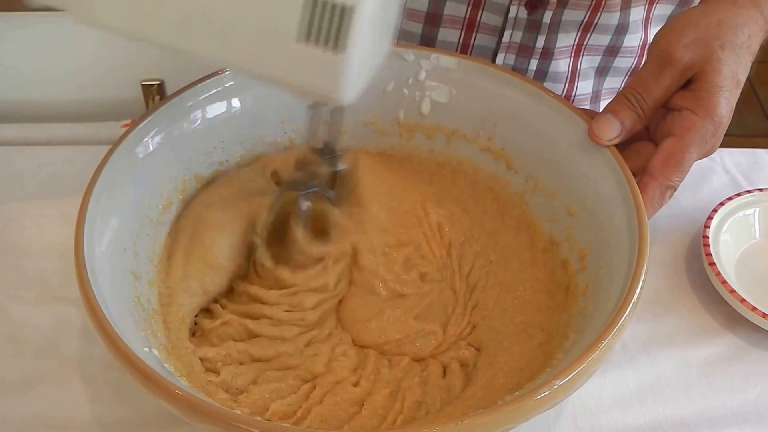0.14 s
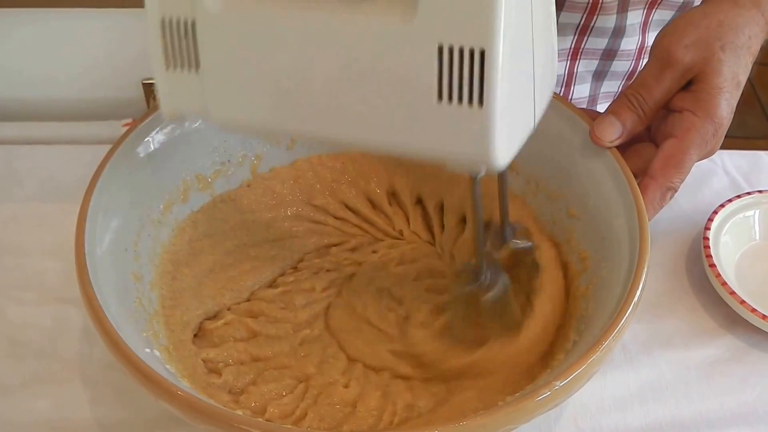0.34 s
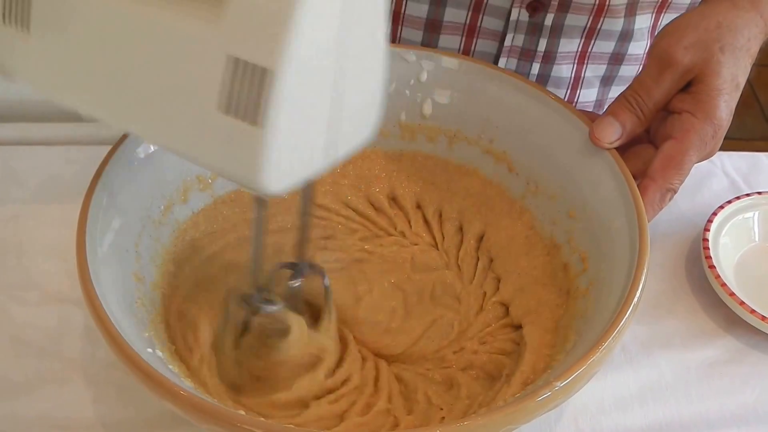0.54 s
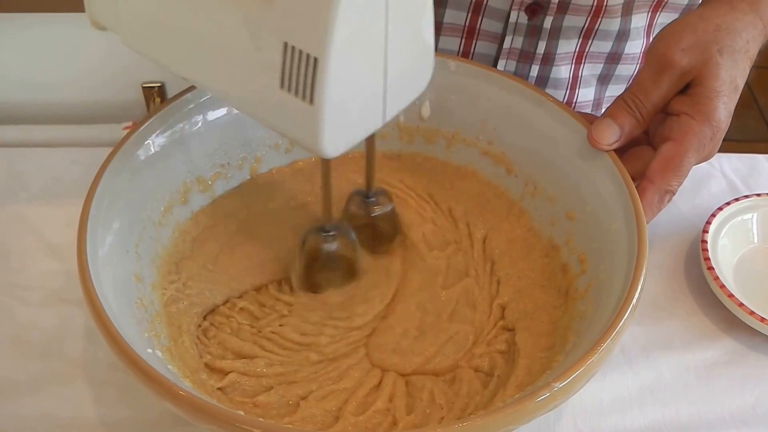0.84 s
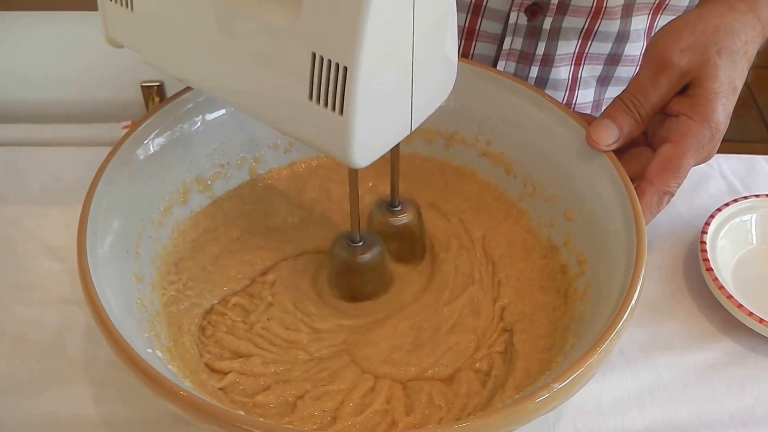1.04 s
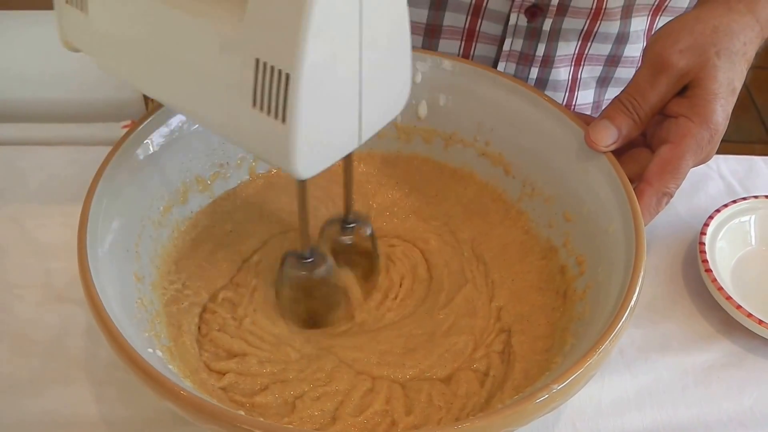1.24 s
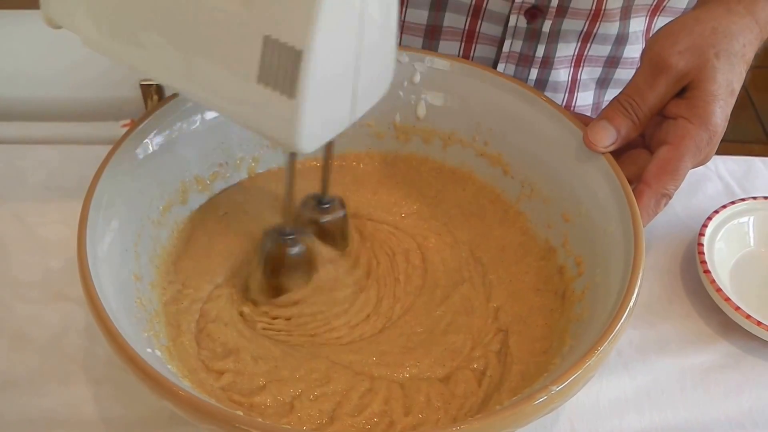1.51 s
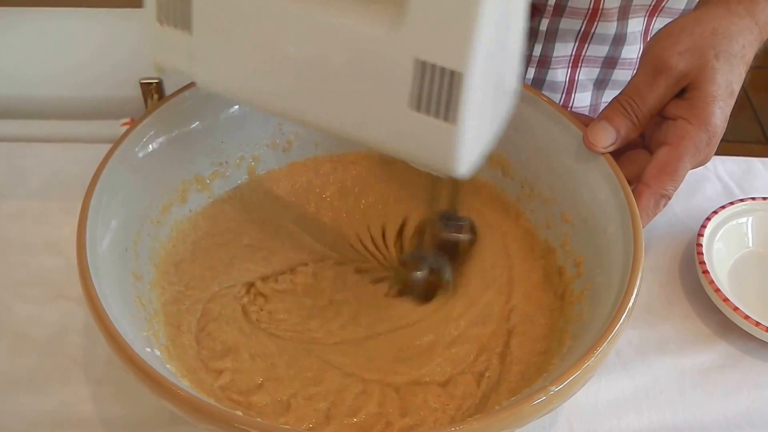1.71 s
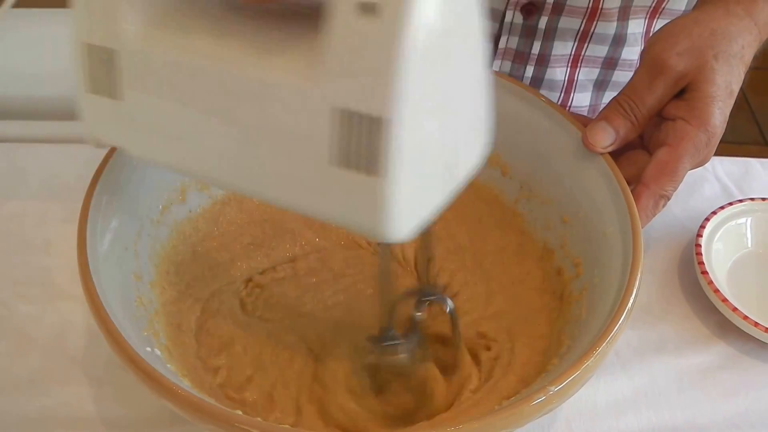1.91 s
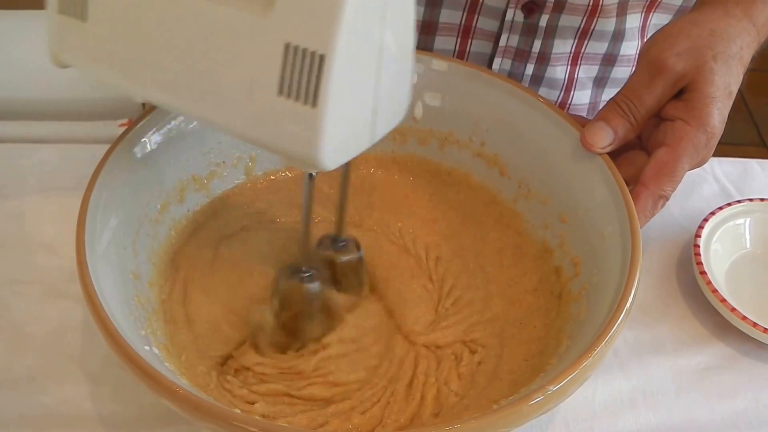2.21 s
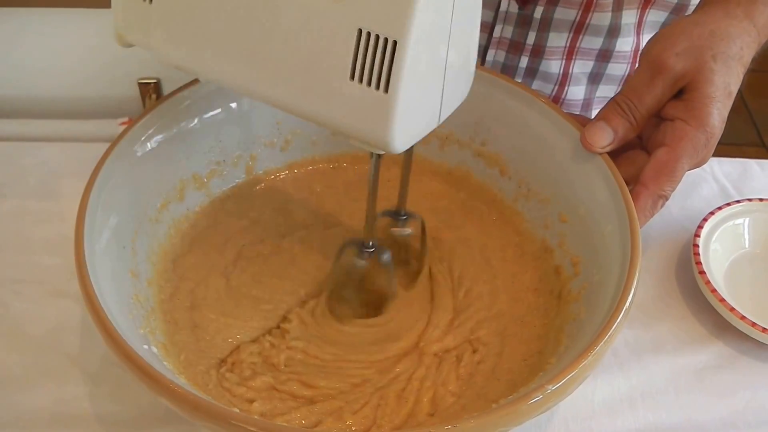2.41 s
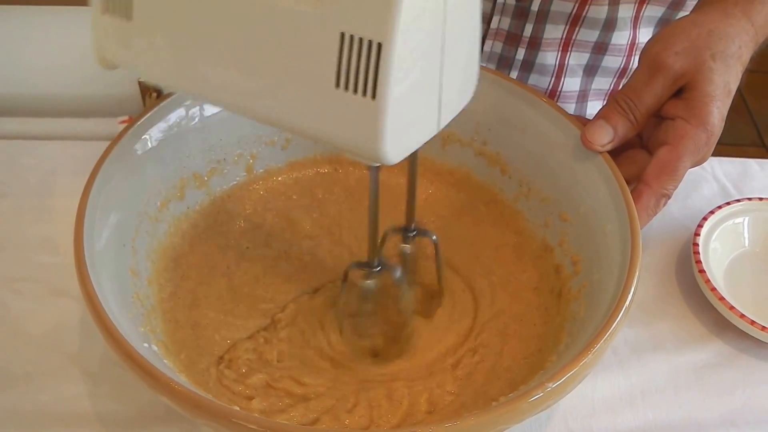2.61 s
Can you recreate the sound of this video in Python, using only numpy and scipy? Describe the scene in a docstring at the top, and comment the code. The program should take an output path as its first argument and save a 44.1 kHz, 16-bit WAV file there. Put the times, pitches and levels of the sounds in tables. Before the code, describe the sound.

An electric hand mixer whines and rattles close by in a kitchen, churning thick batter while its beaters clack against a ceramic bowl. Near the end the switch snaps off and the motor starts winding down.

```python
"""Hand mixer in thick batter

An electric hand mixer whisks in a ceramic bowl, close by in a kitchen. The motor whines on
multiples of its shaft rate over gear rattle, fan rush and brush hiss; the beaters churn the
batter and clack on the bowl. The switch snaps off and the motor coasts down."""
import sys
import numpy as np
from scipy import signal
from scipy.fft import rfft, irfft, next_fast_len
from scipy.io import wavfile
from scipy.ndimage import map_coordinates

SR = 44100
rng = np.random.default_rng(int(sys.argv[2]) if len(sys.argv) > 2 else 0)


def digitize_waveform(pressure):
    """Quantize a signal to 16-bit integers and store it at the path in sys.argv[1].

    Rows of a 2-D input are taken as channels; values are limited to [-1, 1].
    """
    field = np.atleast_2d(pressure).T
    bounded = np.clip(field, -1, 1)
    quanta = np.round(bounded * 32767).astype(np.int16)
    wavfile.write(sys.argv[1], SR, quanta)


N = 121275
T = np.arange(N) / SR
RUN_HZ, MAINS_HZ, OFF_S = 230, 50, 2.216
TEETH, BARS, SLOTS = 7, 24, 12  # gear, commutator, rotor
BLADES, GEAR_RATIO = 4, 20

# second gear-mesh harmonic, swelling with tilt and load: t/s, level/dB
MESH_OCTAVE = [(0,-31),(.17,-27.5),(.3,-30),(.4,-31),(.55,-30.5),(.85,-33.5),(1.05,-28),(1.22,-34),(1.49,-27),(1.56,-32.5),(1.68,-24.5),(1.77,-30.5),(1.88,-29.5),(2.0,-33),(2.14,-23.5),(2.24,-31.5)]
# batter churn: t/s, level/dB
CHURN_LEVEL = [(0,-34),(.1,-47),(.145,-28.5),(.22,-47),(.3,-35),(.44,-39.5),(.59,-32.5),(.7,-50),(1.38,-48.5),(1.57,-40),(1.68,-28),(1.84,-27.5),(1.93,-43),(2.0,-34),(2.17,-38),(2.33,-53.5)]
# switch detents: t/s, level/dB
DETENTS = [(2.196,-11),(2.263,-7)]
# left-right likeness: f/Hz, correlation
COHERENCE = [(400,0.94),(2400,0.99),(4400,0.74),(8000,0.44),(15000,0.64)]


def whine(shaft_hz, angle, swell_db=2.5, flutter=0.26, shake=0.31, gear_db_per_oct=34):
    """Shaft harmonics: gear mesh, commutator, and rotor slots with sidebands a tooth count away."""
    # gear mesh, swelling with tilt and load: t/s, level/dB
    mesh = [(0,-34),(.06,-31.5),(.22,-38.5),(.47,-31.5),(.85,-41),(1.4,-38),(1.85,-40),(2.05,-29.5),(2.14,-43.5)]
    # commutator line: t/s, level/dB
    commutator = [(.2,-41),(.55,-32.5),(.85,-37.5),(1.17,-33.5),(1.28,-39),(1.4,-29.5),(1.55,-38),(1.68,-26),(1.8,-34),(2.0,-31),(2.2,-39)]
    # high slot whine: t/s, level/dB
    slot_whine = [(.17,-35),(.35,-40),(.7,-38),(.95,-28),(1.2,-32),(2.42,-33),(2.55,-42)]
    # other steady lines: shaft order -> level/dB
    hum = {2: -37, 42: -42, 59: -41}
    # fade as the shaft slows: shaft order, slope/(dB per octave of speed)
    fade_slopes = [(2,90),(24,22),(60,13),(90,12)]
    top_slot_order, sideband_db, weak_db = 60, -42, -48.5
    dull_below_hz, dull_db = 9500, -6
    ripple_rad, jitter_rad = .005, .001

    angle = angle + ripple_rad * mains() + jitter_rad * wobble(85)
    speed_oct = np.log2(shaft_hz / RUN_HZ)
    gear_fade_db = gear_db_per_oct * speed_oct
    slot_db = curve(slot_whine)
    trim_db = lambda k: along(fade_slopes, k) * speed_oct + dull_db * (k * shaft_hz < dull_below_hz)
    lead_db = {TEETH: curve(mesh) + gear_fade_db,
               2 * TEETH: curve(MESH_OCTAVE) + gear_fade_db,
               BARS: curve(commutator) + along(fade_slopes, BARS) * speed_oct,
               SLOTS: -22 + 0.5 * curve(CHURN_LEVEL) + gear_fade_db,  # follows the load
               top_slot_order: slot_db + trim_db(top_slot_order)}
    out = np.zeros((2, N))
    for k in range(2, 110):
        if k in lead_db:
            gain = amp(lead_db[k]) * (1 + flutter * wobble(130) + shake * wobble(34.98))
        else:
            db = weak_db
            if k % SLOTS == 0:
                db = slot_db - 4
            elif k % SLOTS in (TEETH, SLOTS - TEETH):
                db = sideband_db
            gain = amp(hum.get(k, db) + swell_db * (1 - speed_oct) * wobble(14) + trim_db(k))
        out += gain * (k * shaft_hz < SR / 2) * tone(k, angle)
    return out


def chatter(angle, level_db=-7, pitch_ratio=.968):
    """The worm gear chatters just below the second mesh harmonic, until the last detent."""
    gain = amp(curve(MESH_OCTAVE) + level_db) * wobble(300)
    return gain * tone(2 * TEETH, pitch_ratio * angle) * (T < DETENTS[-1][0])


def coast(angle, flutter=0.24, rise_s=0.16):
    """Slack gears slide down in pitch after power-off, swelling at each gearbox resonance."""
    # gear lines: shaft order
    orders = (3,4,6,7,12)
    # the same lines: level/dB
    levels_db = [-41,-43,-35,-33,-32.5]
    # gearbox radiation: f/Hz, level/dB
    gearbox = [(450,-24),(570,0),(700,-26),(940,-16),(1080,1),(1230,-18),(1490,1),(1770,-13),(1900,-1),(2080,0),(2250,-18),(2430,0),(2650,-16)]
    lines = sum(amp(db) * (1 + flutter * wobble(90)) * tone(k, angle)
                for k, db in zip(orders, levels_db))
    onset = np.clip((T - OFF_S) / rise_s, 0, 1)
    return filtered(lines * onset, lambda hz: amp(along(gearbox, hz)))


def rattle(speed_oct, angle, level_db=-30.5, rough_db=1.5, blade_db=-1.0, db_per_oct=9):
    """Gear rattle rings the plastic shell, pulsing with the beater blades."""
    # shell resonances: f/Hz, width/Hz, level/dB
    shell_modes = [(455,35,-10.5),(573,46.4,-4),(1033,147,-5),(1540,33.4,0),(1855,82,-2.5),(2464,185,-8),(3080,194,-4)]

    def shell(hz):
        return sum((-1) ** k * amp(db) * 1j * hz * width / (centre ** 2 - hz ** 2 + 1j * hz * width)
                   for k, (centre, width, db) in enumerate(shell_modes))

    blades = np.sin(BLADES * angle / GEAR_RATIO)
    gate = amp(rough_db * wobble(300) + blade_db * blades + 0.42 * wobble(23.52))
    ringing = filtered(gate * rng.standard_normal((2, N)), shell)
    return unit(spread(ringing)) * amp(level_db + db_per_oct * speed_oct)


def fan(speed_oct, angle, level_db=-28, turn_db=0.73, flicker_db=1.54, db_per_oct=10):
    """The cooling fan rushes, pulsing once a turn."""
    # air rush: f/Hz, level/dB
    spectrum = [(25,-37),(60,-3.5),(130,-19.5),(350,-10.5),(520,-11),(1300,-1.5),(2200,3.5),(3700,3),(6200,5),(7800,-4),(10000,0.5),(16000,-6.5)]
    gate = amp(turn_db * np.sin(angle) + flicker_db * wobble(29.81))
    return noise(spectrum, gate) * amp(level_db + db_per_oct * speed_oct)


def brushes(speed_oct, angle, turn_db=2.0, buzz_db=3, mains_db=2.0, flicker_db=1.3, db_per_oct=4):
    """Carbon brushes hiss on the commutator, in step with the shaft and the current."""
    # brush friction: f/Hz, level/dB
    spectrum = [(5000,-27),(8200,-29),(10000,1),(11800,-2.5),(13300,7),(14500,7),(15600,4.5)]
    # hiss envelope: t/s, level/dB
    hiss = [(.17,-24),(.24,-34),(.45,-27.5),(.78,-27),(.95,-22),(1.4,-23.5),(1.6,-19.5),(1.84,-26),(2.2,-23.5),(2.6,-26.5)]
    shaft_db = turn_db * np.sin(angle) + buzz_db * np.sin(6 * angle)
    gate = amp(shaft_db + mains_db * mains() + flicker_db * wobble(45.8))
    return noise(spectrum, gate) * amp(curve(hiss) + db_per_oct * speed_oct)


def clacks(crack_t60_s=.019, spray_t60_s=.022, tick_t60_s=.004, knock_t60_cycles=36, crack_q=1.3):
    """A beater hits the bowl: tick, crack and choked ring dulled by batter, then a hollow knock."""
    # strikes: t/s, level/dB, relative knock level/dB, crack f/Hz, knock f/Hz
    strikes = [(.1392,-8,-2,2200,900),(.163,-6.5,-10,4700,800),(.183,-14,0,4300,1350),(.2055,-8,-6,4700,1800),(.227,-4,-7,4080,1250),(.247,-10,-1,4600,1230),(.269,-2,-8,4600,1250),(.2893,-9,-1,4100,700),(.3864,-6,-1.5,4300,650),(.4745,-7.5,-14,3400,700),(.497,-5.5,-8,3100,900),(.552,-3,-12,3800,900),(.581,-10,-4,3700,600),(1.831,-3,-6,2350,650),(1.967,-7,-13,3340,600),(1.989,-2,-16,3500,700),(2.0197,-7,-10.5,3550,600)]
    # damped modes of bowl and beater: f/Hz, level/dB, t60/s
    bowl_modes = [(2756,-3,.055),(3400,-5.5,.016),(3937,-8,.04),(5450,0,.012)]
    mode_hz, mode_db, mode_t60_s = np.transpose(bowl_modes)[:, :, None]
    t = np.arange(SR // 8) / SR
    decay = lambda db, t60_s: amp(db - 60 * t / t60_s)
    out = np.zeros((2, N))
    for start_s, level_db, knock_db, crack_hz, knock_hz in strikes:
        white = rng.standard_normal((2, len(t)))
        band = lambda hz, q: unit(signal.lfilter(*signal.iirpeak(hz, q, SR), white))
        crack = band(crack_hz, crack_q) * decay(-7, crack_t60_s)
        spray_lowpass = signal.butter(2, min(2 * crack_hz, 15000), fs=SR)
        spray = unit(signal.lfilter(*spray_lowpass, white)) * decay(-20, spray_t60_s)
        tick = .5 * decay(-1, tick_t60_s) * np.sin(2 * np.pi * crack_hz * t)
        tick = tick * np.array([[1], [0]])  # mid only
        # modes near the crack ring most
        detuning = np.hypot(1, crack_q * (mode_hz / crack_hz - crack_hz / mode_hz))
        phase = rng.uniform(0, 2 * np.pi, (2, *mode_hz.shape))
        modes = decay(mode_db - 9, mode_t60_s) / detuning * np.sin(2 * np.pi * mode_hz * t + phase)
        batter_lowpass = signal.butter(6, 1.42 * crack_hz, fs=SR)
        strike = signal.lfilter(*batter_lowpass, modes.sum(1) + crack + tick)
        knock = band(knock_hz, q=2.2) * decay(knock_db - 9.5, knock_t60_cycles / knock_hz)
        knock *= 1 - np.exp(-t / .0015)
        out[:, round(start_s * SR):][:, :len(t)] += amp(level_db) * (strike + spray + knock)
    return spread(out)


def batter(angle, slap_db=4, lumps_db=1.5):
    """Each blade slaps into the batter, hardest where it lies deep."""
    # churning: f/Hz, level/dB
    spectrum = [(20,-35),(48,-5.5),(72,-16),(115,3),(180,-6.5),(330,-8),(600,-5.5),(1200,-14),(1900,-10.5),(6000,-31)]
    gate = amp(slap_db * np.sin(BLADES * angle / GEAR_RATIO) + lumps_db * wobble(63))
    return noise(spectrum, gate) * amp(curve(CHURN_LEVEL))


def switch(rise_s=0.00073, t60_s=0.028):
    """The plastic slider snaps through two detents to off."""
    # snap: f/Hz, level/dB
    spectrum = [(200,-25),(1000,-4),(2000,-10),(2700,-3),(3500,2),(5000,-7),(8000,-11),(10500,-4),(15500,-9)]
    envelope = sum(amp(db - 60 * np.maximum(T - s, 0) / t60_s) * np.exp(np.minimum(T - s, 0) / rise_s)
                   for s, db in DETENTS)
    return envelope * noise(spectrum)


def kitchen(x, t60_s=0.2, wet_db=-15):
    """Adds a short bright room tail."""
    t = np.arange(SR // 3) / SR
    tail = rng.standard_normal((2, len(t))) * amp(-60 * t / t60_s) * (t > .004)
    return x + amp(wet_db) * signal.fftconvolve(x, tail / np.linalg.norm(tail[0]), axes=1)[:, :N]


def mains():
    """Current ripple, twice a mains cycle, until the power is cut."""
    return np.sin(4 * np.pi * MAINS_HZ * T) * (T < OFF_S)


def tone(k, angle, width=0.71):
    """Shaft harmonic k at rms 1, offset in phase between the channels."""
    apart_rad = width * (-1) ** k * np.arccos(np.clip(along(COHERENCE, k * RUN_HZ), -1, 1))
    phase = rng.uniform(0, 2 * np.pi) + np.array([[apart_rad], [-apart_rad]])
    return np.sqrt(2) * np.sin(k * angle + phase)


def noise(spectrum, gate=1):
    """Stereo noise of rms 1, gated and then coloured."""
    gated = gate * rng.standard_normal((2, N))
    return unit(spread(filtered(gated, lambda hz: amp(along(spectrum, hz)))))


def spread(pair):
    """Mid and side to left and right: alike in the bass, apart in the treble."""
    turn = lambda hz: np.arccos(np.clip(along(COHERENCE, hz), -1, 1)) / 2
    mid, side = filtered(pair, lambda hz: np.array([np.cos(turn(hz)), np.sin(turn(hz))]))
    return np.array([mid + side, mid - side])


def filtered(x, response):
    """x through a frequency response."""
    size = next_fast_len(N + 8192)
    return irfft(rfft(x, size) * response(np.fft.rfftfreq(size, 1 / SR)), size)[..., :N]


def wobble(rate_hz):
    """Smooth random curve with knots at rate_hz."""
    return map_coordinates(rng.standard_normal(2048), [T * rate_hz], mode="wrap", order=2)


def curve(rows):
    """(t/s, value) rows to one value per sample."""
    return np.interp(T, *np.transpose(rows))


def along(rows, x):
    """(x, value) rows interpolated on a log axis."""
    knots, values = np.transpose(rows)
    return np.interp(np.log(x + 1), np.log(knots + 1), values)


def amp(db):
    """Decibels to gain."""
    return 10 ** (np.asarray(db) / 20)


def unit(x):
    """Scaled to rms 1."""
    return x / np.sqrt(np.mean(x ** 2) + 1e-20)


def scene():
    """One shaft drives motor noise and churning; clacks and switch ring in the room."""
    # shaft rate, sagging in deep batter and falling after power-off: t/s, f/Hz
    shaft_rate = [(0,223.6),(.17,225.8),(.37,228.4),(.62,226.4),(.85,230.9),(1.0,232.4),(1.13,233.1),(1.47,230.6),(1.65,232.4),(1.88,229.2),(2.08,227.3),(2.2,227.8),(2.24,225.5),(2.34,201),(2.45,173),(2.54,152.6),(2.66,126.5),(2.75,109.6)]
    # balance, left over right: f/Hz, level/dB
    balance = [(2000,-0.5),(3200,1.5),(5500,-3.5),(6800,2.5),(9000,-2),(15000,-2.5)]
    shaft_hz = curve(shaft_rate)
    speed_oct = np.log2(shaft_hz / RUN_HZ)
    angle = 2 * np.pi * np.cumsum(shaft_hz) / SR
    motor = whine(shaft_hz, angle) + chatter(angle) + coast(angle)
    motor += rattle(speed_oct, angle) + fan(speed_oct, angle) + brushes(speed_oct, angle)
    mix = motor + batter(angle) + kitchen(clacks() + switch())
    return filtered(mix, lambda hz: amp(along(balance, hz) * np.array([[.5], [-.5]])))


def record(dry, ceiling=.85, top_hz=15740, notch_hz=7870, half_width_hz=190):
    """Peak clipping, a narrow treble notch and a steep band limit."""
    response = lambda hz: (hz < top_hz) * np.maximum(abs(hz - notch_hz) > half_width_hz, .01)
    return filtered(np.clip(dry, -ceiling, ceiling), response)


dry = scene()
out = record(dry)
digitize_waveform(out)
```